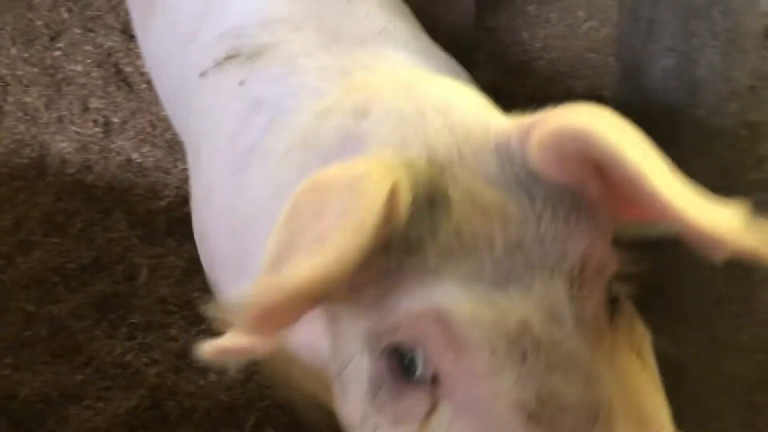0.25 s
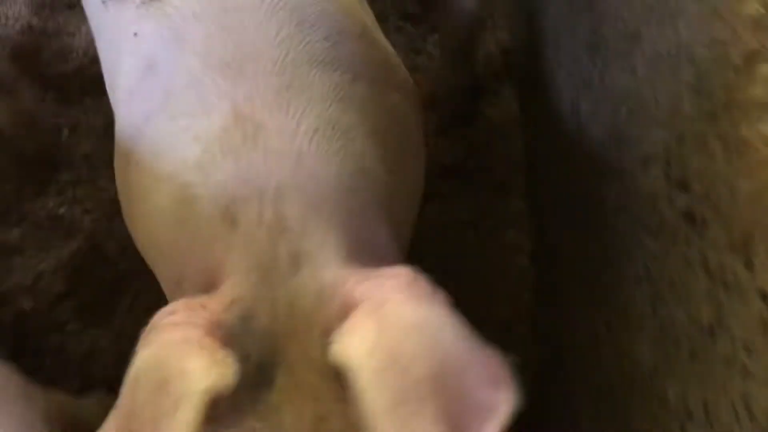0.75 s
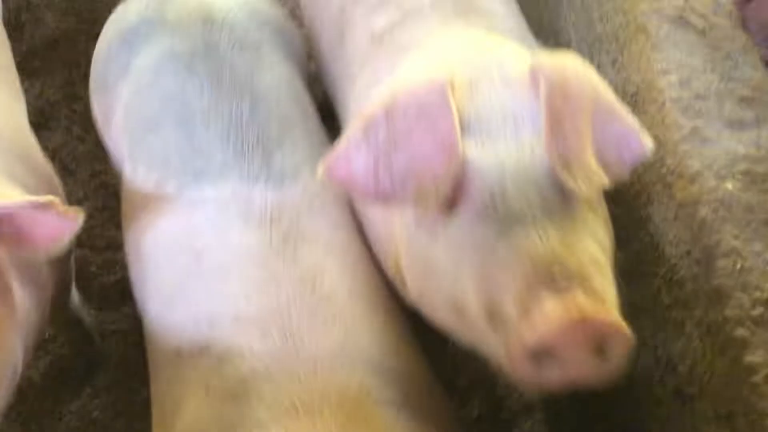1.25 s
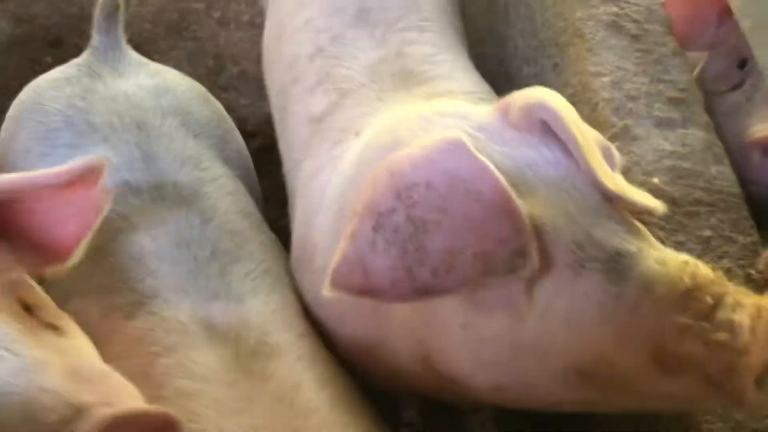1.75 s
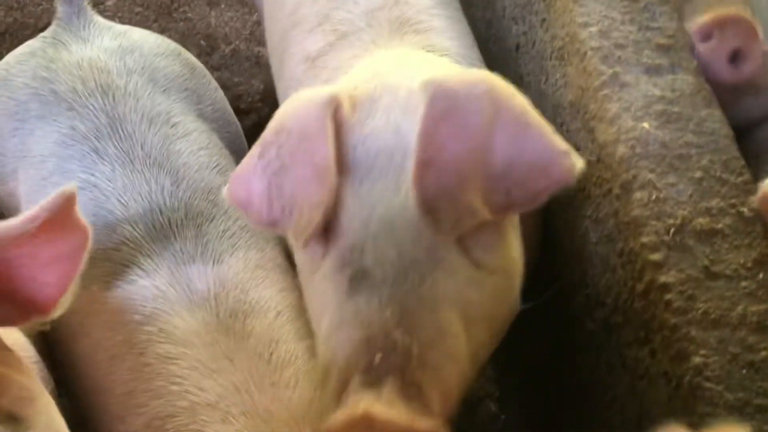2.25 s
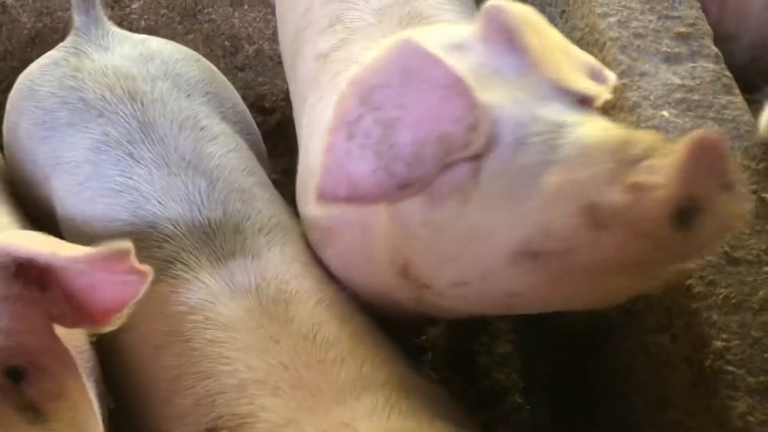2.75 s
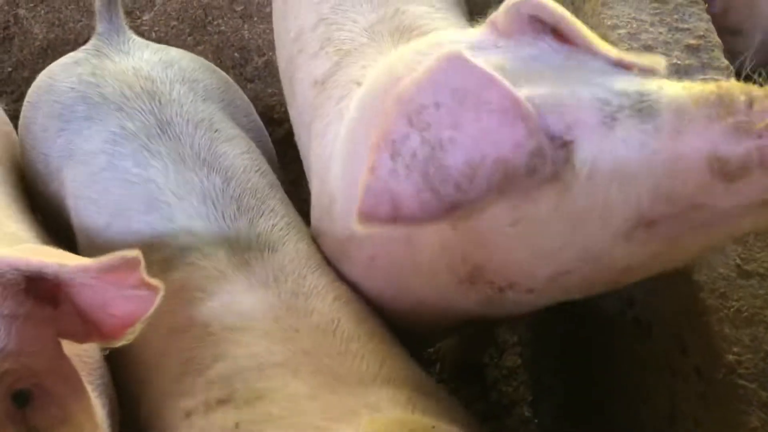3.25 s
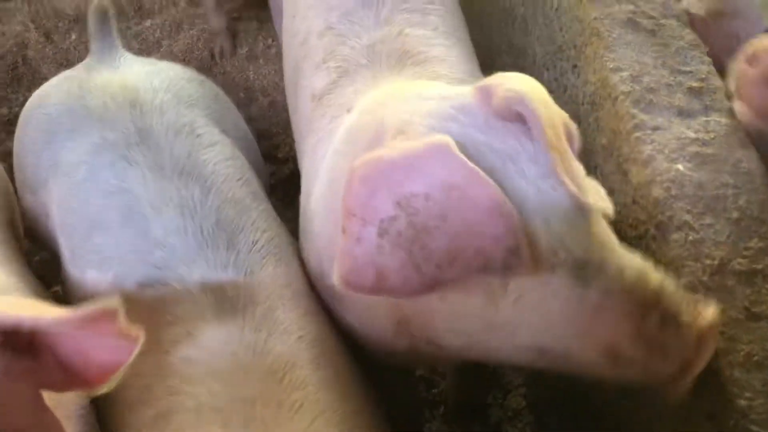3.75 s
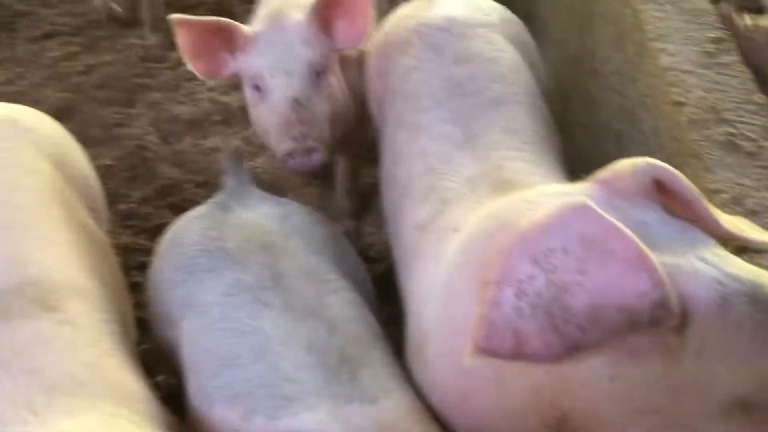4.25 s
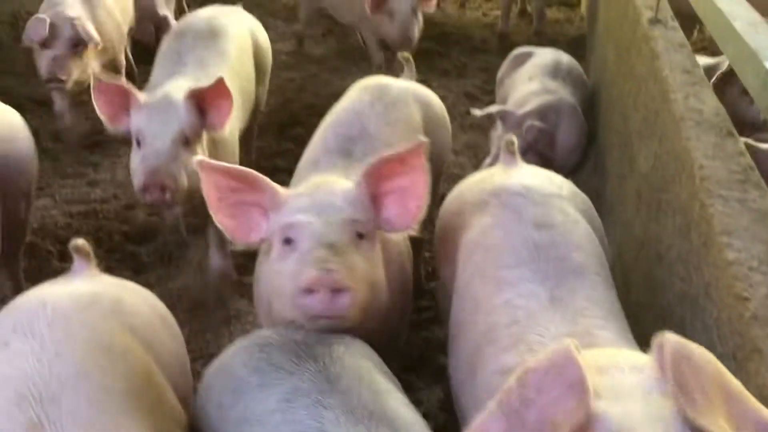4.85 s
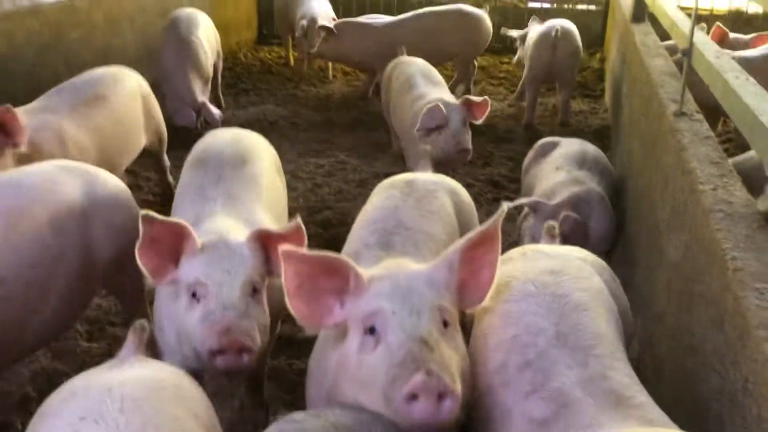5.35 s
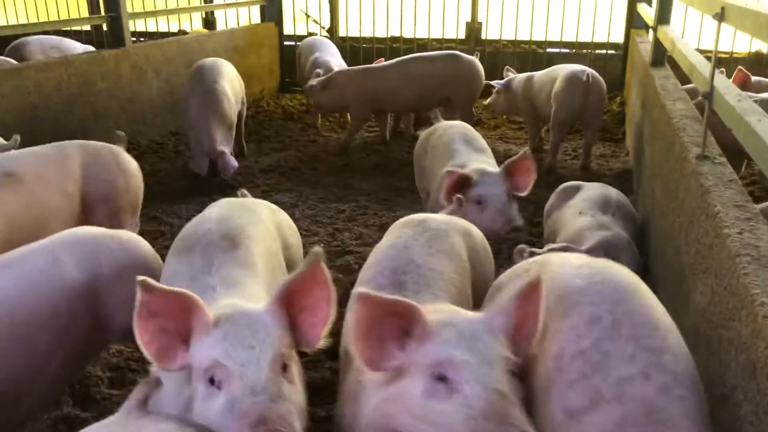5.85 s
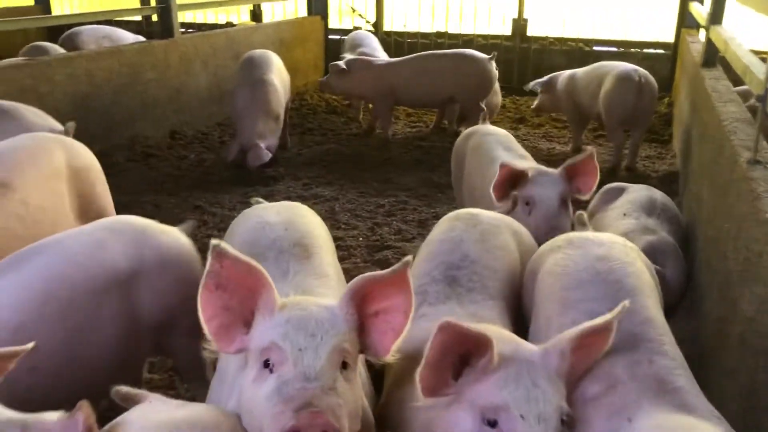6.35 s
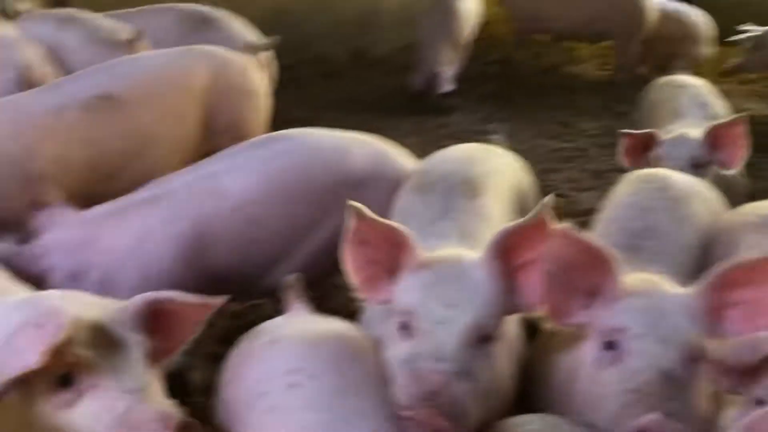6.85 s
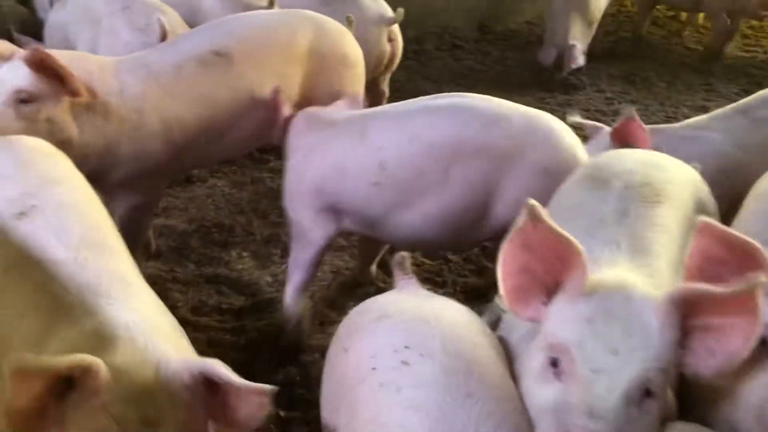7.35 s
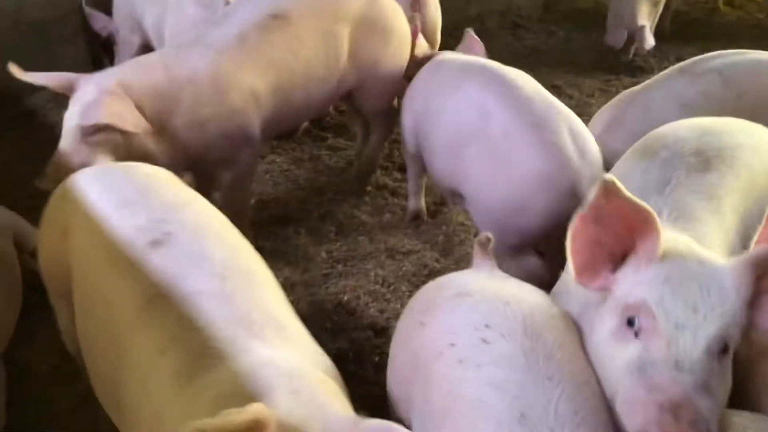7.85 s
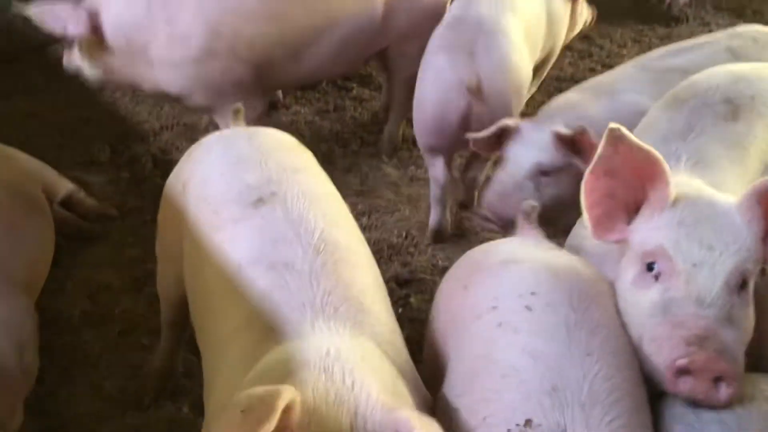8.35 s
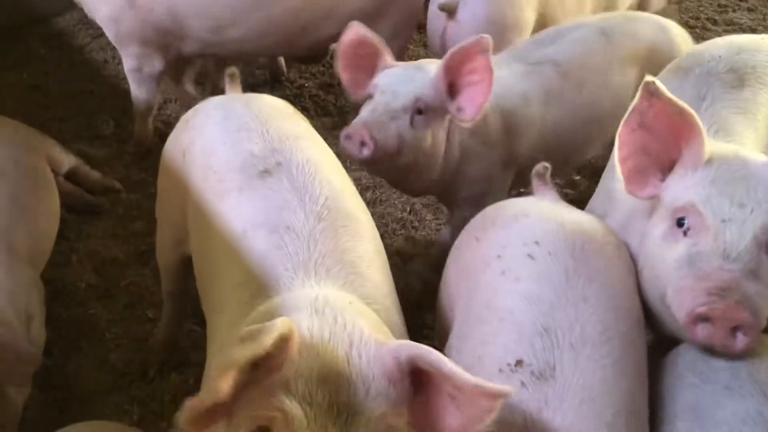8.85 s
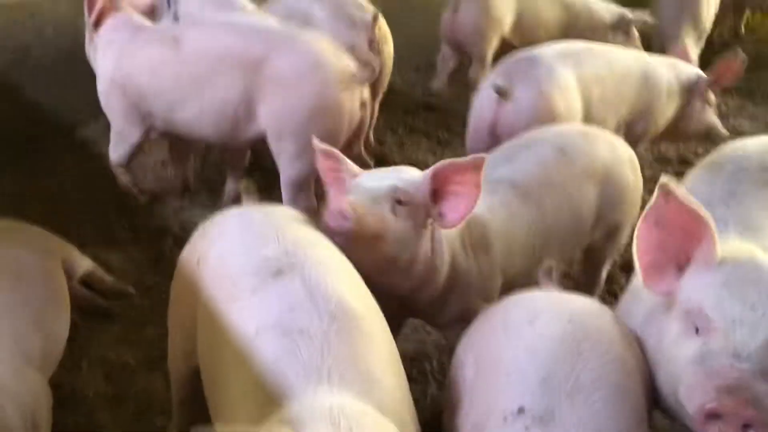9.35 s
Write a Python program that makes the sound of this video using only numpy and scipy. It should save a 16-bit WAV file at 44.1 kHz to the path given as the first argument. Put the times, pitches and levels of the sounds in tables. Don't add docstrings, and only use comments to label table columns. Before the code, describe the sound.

A crowded pen of young pigs, heard very close in a shed with a short, dull echo. From 0 to 1.5 seconds, rough open-mouthed grunts overlap, the loudest around 0.7 to 1.2; each is a brief flutter of about forty flaps a second. A firm, muted knock comes at 1.75. More bright, nasal and raspy grunts cluster at 1.9 to 3.2 with body thumps and hoof scuffles, then a soft knock at 3.3. Single grunts follow at 3.7 and 3.9. At 4.2 a hoof bangs the wall sharply, with a thud and quick flank scrape at 4.4. Afterwards it is quieter: isolated grunts at 5.1, 6.4, 7.15 and 7.7, a raspy one at 8.7, a sharper cry at 9.0 and a bright burst at 9.3. Throughout, distant grunts, faint whistling sniffs, low bumps and rustling straw continue.

```python
import sys
import numpy as np
from scipy import signal
from scipy.fft import rfft, irfft
from scipy.io import wavfile
from scipy.ndimage import uniform_filter1d

SR = 44100
rng = np.random.default_rng(int(sys.argv[2]) if len(sys.argv) > 2 else 0)


def output_pcm(signal):
    pcm = np.clip(np.atleast_2d(signal).T, -1, 1) * 32767
    wavfile.write(sys.argv[1], SR, np.round(pcm).astype(np.int16))


def volts(x):
    e = np.asarray(x, float) / 20
    return 10 ** e


N = 422919


def grunts():
    # (first flap [s], last flap [s], effort [dB],
    # swell from first to last flap [dB], chest level [dB])
    open_mouthed = [(0.118, 0.187, -4.5, 6.5, -6), (0.364, 0.39, -11, 3.5, 5),
                    (0.404, 0.474, -5, -6.5, 1.5)]
    bright = [(1.41, 1.435, -4, 4.2, 9.3), (1.948, 1.977, -5.5, 5.9, 8.8), (2.751, 2.808, -6.5, 0.96, 8)]
    wide = [(0.699, 0.743, 0, 0.5, 5.1), (0.825, 0.854, 1, 5.5, 0.51), (9.332, 9.384, -15, -13.5, 2.6)]
    cry = [(8.965, 9.01, -4, 5, 10.2)]
    big = [(0.751, 0.82, -15.5, -11, -17), (1.076, 1.076, -9.5, -2.5, 7.5),
           (1.255, 1.361, -16.5, -10.5, 2.5), (3.014, 3.068, -16, 0, 3), (9.291, 9.32, -18, -8, 1),
           (0.015, 0.09, -16, -11, -5), (0.152, 0.176, -24, 0, -8), (0.191, 0.19, 0, -2, -6),
           (0.212, 0.238, -24, -2, 0), (0.415, 0.415, -22, 0, -5), (0.527, 0.527, -12, -2, -5),
           (1.455, 1.455, -25, 0, -5)]
    bold = [(1.104, 1.149, 3.5, -1.2, 6.5)]
    rasp = [(0.3, 0.349, -21.5, 13, 4.5), (0.545, 0.572, -12, -2, 3), (2.175, 2.175, -6, -3, 5),
            (3.473, 3.553, -13, 5, -7), (3.709, 3.741, -2.5, -2, 3.5), (5.163, 5.217, -7.5, 4, 3.5),
            (7.216, 7.217, -14.5, 1, -5), (8.655, 8.793, -5, -3.5, 1.5), (8.708, 8.707, -5, 0, -6)]
    brisk = [(1.475, 1.541, -6, 4, 1.5), (2.115, 2.231, -16.5, -4, -2), (2.342, 2.39, -7.5, 9, 1),
             (2.398, 2.424, -12.5, -9, 14.5), (2.824, 2.907, -15.5, -11, 6.5), (3.092, 3.16, -8, -0.5, 8.5)]
    hollow = [(7.645, 7.769, -12, 3, 0), (6.407, 6.407, -7.5, 3, 2.4)]
    pinched = [(9.259, 9.312, -3.5, 5.7, -0.66)]
    quick = [(5.086, 5.149, -20, 2, -5), (6.73, 6.776, -23, -1.9, 8.5)]
    chesty = [(0.484, 0.512, -15, 2, 5), (0.526, 0.582, -12, 1, 13.5), (1.705, 1.704, -20.5, -3, -3),
              (2.008, 2.039, -19, -12, 18.5), (2.795, 2.796, -20, -5, 9), (3.02, 3.075, -24, -11, -6),
              (3.644, 3.669, -17.5, 2, 6), (4.537, 4.56, -25, 6, 8), (4.589, 4.676, -20, -12, 3),
              (6.006, 6.079, -22.5, 5, 19.5), (7.787, 7.912, -20.5, 4, 17), (8.089, 8.118, -16, 5.5, 13.5),
              (8.214, 8.241, -17, 3.5, 12), (9.557, 9.583, -26, -4, 11),
              (1.235, 1.5, -35, -1, 27), (1.18, 1.205, -35, -6, 5), (4.492, 4.492, -19, -2, 0),
             (5.002, 5.03, -23.5, -2, 0), (5.245, 5.262, -24, -7, 0), (5.98, 5.98, -26, -2, 15),
             (8.188, 8.188, -27, 2, 5), (8.84, 8.84, -22, 6, 5.5), (9.349, 9.378, -26, -5, -6),
             (0.2, 0.235, -20.5, -7, 3)]
    mumble = [(2.034, 2.192, -38, 3, 12), (6.989, 7.049, -28.5, -3, 3.1), (7.265, 7.347, -32, 4.5, 27)]
    dull = [(6.63, 6.702, -29, 3.1, 14), (8.401, 8.518, -20.5, 1.8, 4)]
    nasal = [(7.469, 7.523, -16, 10, -5)]
    rattle = [(5.778, 5.846, -20, 4.5, 5), (1.566, 1.566, -34, 0, 0)]
    climb = [(3.883, 3.885, -25, 4, -6), (3.911, 3.997, -13.5, -8, 4)]
    sharp = [(6.351, 6.379, -6, 4.1, 0)]
    snappy = [(7.126, 7.185, -6.5, -4, -1)]
    tick = [(7.095, 7.095, -24.5, 0, 10), (6.322, 6.322, -36, 0.0014, 0), (4.89, 4.902, -36, 0, -2),
            (4.928, 4.94, -38, 0, 0), (7.335, 7.335, -31, 0, 0), (0.364, 0.364, -27, 0, 0),
            (0.439, 0.439, -26, 0, 2)]
    callers = [open_mouthed, bright, wide, cry, big, bold, rasp, brisk, hollow, pinched, quick,
               chesty, mumble, dull, nasal, rattle, climb, sharp, snappy, tick]
    paces = [42, 42, 42, 65, 42, 42, 36, 42, 40, 40, 62, 40, 49, 42, 38, 60, 36, 36, 34, 80]
    # (chest [Hz], mouth [Hz], snout [Hz], nostrils [Hz])
    heads = [(322, 800, 1380, 4500), (379, 875, 1600, 4250), (402, 890, 1240, 3930), (398, 950, 1510, 5100),
             (348, 1000, 1724, 5400), (442, 1600, 1800, 3800), (252, 1100, 1520, 4400),
             (282, 810, 1450, 4310), (260, 759, 1450, 4200), (281, 830, 1440, 4900), (303, 733, 1580, 7000),
             (275, 650, 1700, 3600), (285, 683, 1100, 4300), (300, 740, 1600, 4290),
             (262, 1190, 1544, 4290), (313, 870, 1485, 4400), (244, 780, 1504, 5260),
             (241, 1180, 1500, 4950), (257, 1110, 1520, 4610), (260, 930, 1500, 4420)]
    # (mouth [dB], palate [dB], nostrils [dB], softening at the ends of a grunt [dB])
    manners = [(8, -26, -14.5, 5), (6.5, -18, -5, 6.5), (4.5, -41, -9, 7), (11.5, -46, -14, 8),
               (-20, -13, -17, 4.5), (-12, -27, -8, 5.5), (-16, -7.5, -10.5, 5.5), (-11, -8, -5.5, 3),
               (-12, -19, -17, 1.5), (-7.5, -42, -16, 1.4), (-2.5, -24, -27, 1.5), (9, -7, -4, 5),
               (15.5, -2, -2, 2.5), (3, -40, -31, 3.5), (7.5, -25, -40, 3), (-14, -5, -16, 0.5),
               (-27, -1.5, -4, 4.5), (-7, 0, -7, 2.5), (-4, -12, -6.5, 10.5), (-22, -10, 4, 0.5)]
    # (frequency [Hz], level [dB], frequency [Hz], level [dB], opening [share])
    sinus_rings = [(2060, -17, 2860, -17, 0.012), (2206, -7.5, 6000, -17.5, .01),
                   (2120, -16, 1670, -6.5, .01), (3630, -10, 3900, -10, -0.15),
                   (2840, -5.5, 4300, -7.5, 0.026), (2260, -7, 1500, -7, -0.0002),
                   (2554, -11, 4413, -13.5, 0.071), (2885, -8.5, 3900, -10, 0.053),
                   (2900, -13.5, 4860, -14, 0.035), (3010, -15, 6000, -16.5, 0.24),
                   (1910, -6.5, 3200, -25, 0.02), (2890, -3.5, 5900, -10, 0.044),
                   (2620, -6, 5500, -11, .03), (1770, -22, 3500, -17, .03), (2760, -12, 1500, -3, .03),
                   (2450, -10, 3800, -15, 0.026), (2532, -16, 1160, 2, 0.22), (2520, -4.5, 3960, -8, .16),
                   (2720, -4.5, 2100, -4, 0.026), (2960, -5, 7230, -5.5, 0.01)]
    rebound_db, second_rebound_db = -18.5, -29.5
    snout_opening = 0.034
    chest_ring = 0.36
    lead_s = .0005

    out = np.zeros(N)
    for calls, pace, head, manner, sinus in zip(callers, paces, heads, manners, sinus_rings):
        chest_hz, mouth_hz, snout_hz, nostril_hz = head
        *mouth_levels, arch_db = manner
        *sinus, nostril_opening = sinus
        for first, last, effort_db, swell_db, chest_db in calls:
            for u in np.linspace(-1, 1, round((last - first) * pace) + 1):
                db = effort_db + u * swell_db / 2 - u * u * arch_db
                s = first - lead_s + (last - first) * (u + 1) / 2
                late, weak, later = rng.random(3)
                sound = flap(chest_hz, mouth_hz, snout_hz * (1 + snout_opening * u),
                             nostril_hz * (1 + nostril_opening * u), chest_db, *mouth_levels,
                             np.reshape(sinus, (2, 2)), chest_ring / pace)
                add(out, s, volts(db - 3.0) * sound)
                add(out, s + .007 + .008 * late, volts(db + rebound_db - 10 * weak) * sound)
                add(out, s + .012 + .01 * later, volts(db + second_rebound_db + 8 * weak) * sound)
    return out


def flap(chest_hz, mouth_hz, snout_hz, nostril_hz, chest_db, mouth_db, palate_db, nostril_db, sinuses,
         chest_s):
    # (frequency [Hz], decay [s], level [dB])
    palate = [(2650, .0025, 0), (3050, .003, -1)]
    # (frequency [Hz], decay [s], level [dB])
    nostrils = [(3680, 0.0017, -6.5), (4370, 0.0015, 6), (4750, 0.0015, -1), (5800, 0.0024, -7),
                (7000, 0.00082, -15.5), (8400, 0.00057, -9), (11400, .0005, -22)]
    linger, linger_db = 3.47, -19.5
    nostril_late_s = 0.000982
    snap_hz, snap_s, snap_db = 8800, .00008, -6

    t = np.arange(2048) / SR
    luck = rng.standard_normal((17, 2))
    flap_luck = luck[-1]
    pitch_luck, level_luck = luck[:-1, :1], luck[:-1, 1:]

    modes = [(mouth_hz, .003, mouth_db - 4.0), (1200, .002, -7), (snout_hz, .0028, -2),
             (2230, .0025, palate_db / 2 - 7.0), (1.95 * chest_hz, .005, chest_db - 14.5)]
    modes += [(f, d, db + palate_db - 7.5) for f, d, db in palate]
    stretch = nostril_hz / nostrils[1][0]
    modes += [(f * stretch, 1.09 * d, db + nostril_db - 3.5) for f, d, db in nostrils]
    modes += [(f, .0022, db) for f, db in sinuses]
    hz, decay, db = np.array(modes).T[:, :, None]

    puff = np.minimum(t[:256] / .0007, 1) * np.exp(-(t[:256] / .0027) ** 4)
    air = .06 * rng.standard_normal((16, 256)) * puff
    air[:, 40] += 1.2 * volts(5 * flap_luck[1])

    chest = ring(t, chest_hz * (1 + 0.036 * flap_luck[0]), chest_s, chest_db - 8)
    out = (1 - np.exp(-t / 0.0012)) * chest
    out += ring(t, snap_hz, snap_s, snap_db + nostril_db + 4 * flap_luck[1])

    since = np.maximum(t[:1536] - nostril_late_s * np.abs(pitch_luck) * (hz > 3400), 0)
    db = db + np.minimum(hz / 800, 2) * level_luck
    hz = hz * (1 + .012 * pitch_luck)
    struck = ring(since, hz, decay, db)
    struck += ring(since, hz, linger * decay, db + linger_db - 12 * (hz > 4300))
    struck *= 1 - np.exp(-(since * hz / 2.2) ** 2)
    blown = signal.fftconvolve(struck, air, axes=1)
    balance = np.sqrt(np.sum(struck ** 2, axis=1) / np.sum(blown ** 2, axis=1))
    out[:blown.shape[1]] += balance @ blown
    return out


def ring(t, hz, decay, db):
    return volts(db) * np.exp(-t / decay) * np.sin(2 * np.pi * hz * t)


def add(track, s, sound):
    i = int(s * SR)
    track[i:i + len(sound)] += sound[:max(N - i, 0)]


def knocks():
    # (time [s], level [dB], rise [s], decay of the bass [s], tilt [dB/octave])
    blows = [
        (1.753, -23, 0.0077, 0.12, -3.5),
        (3.274, -33.5, 0.0049, 0.097, 2),
        (4.19, -41, 0.022, 0.027, -11),
        (4.227, -18.5, 0.00068, 0.078, 2.5),
        (4.233, -21.5, .001, 0.025, 3),
        (4.425, -29.5, 0.012, 0.065, 3.5),
        (2.672, -44, 0.0018, 0.041, 0),
    ]
    # (frequency [Hz], level [dB])
    blow_colour = [(29, -38), (50, -34), (220, -1), (418, -8), (570, 12.5), (898, -5.5), (1520, -12),
                   (2760, -18), (8460, -39.5), (15000, -45)]
    # (frequency [Hz], level [dB])
    boards = [(180, -3), (215, 2.5)]

    out, t = np.zeros(N), np.arange(SR // 2) / SR
    hz, db = np.transpose(blow_colour)
    for s, level_db, rise, decay, tilt_db in blows:
        onset = np.minimum(t / rise, 1)
        add(out, s, onset * sum(ring(t, f, decay / 2, level_db + d) for f, d in boards))
        for centre in 60 * 2. ** np.arange(8):
            octave = [(centre / 4, -70), (centre / 1.4, -3), (centre * 1.4, -3), (centre * 4, -70)]
            band = colour(rng.standard_normal(len(t)), octave)
            band_db = np.interp(np.log(centre), np.log(hz), db) + tilt_db * np.log2(centre / 500)
            gain = volts(level_db - 25 + band_db) * np.sqrt(centre)
            body = np.exp(-t / (decay * (centre / 250) ** -.3))
            crack = 3.3 * np.exp(-t / 0.0019) * min(centre / 250, 1)
            add(out, s, gain * band * onset * (body + crack))
    return out


def colour(x, points):
    hz, db = np.transpose(points)
    bins = np.fft.rfftfreq(len(x), 1 / SR) + 1
    y = irfft(rfft(x) * volts(np.interp(np.log(bins), np.log(hz), db)), len(x))
    return y / np.sqrt(np.mean(y ** 2))


def scrape():
    # (time [s], ring frequency [Hz], level [dB])
    course = [
        (4.4, 281, -45),
        (4.43, 622, -26),
        (4.452, 1142, -27),
        (4.48, 684, -30),
        (4.519, 352, -32),
    ]
    s, hz, db = np.transpose(course)
    t = np.arange(N) / SR
    hz = np.interp(t, s, hz)
    gain = volts(np.interp(t, s, db, left=-120, right=-120))
    return gain * (narrow(hz, 270) + volts(-10) * narrow(1.75 * hz, 220) + volts(-19) * narrow(2.1 * hz, 300))


def narrow(hz, width_hz):
    k = int(SR / width_hz)
    slow = uniform_filter1d(rng.standard_normal((2, len(hz))), k) * np.sqrt(k)
    turn = 2 * np.pi * np.cumsum(hz) / SR
    return slow[0] * np.cos(turn) + slow[1] * np.sin(turn)


def sniffs():
    # (time [s], length [s], level [dB], first frequency [Hz], last frequency [Hz])
    puffs = [(.3, 0.084, -52, 6500, 6500), (0.435, .16, -57, 6004, 6506), (1.744, 0.07, -44, 5100, 6030),
             (3.64, .13, -40.5, 6480, 7000), (4.7, .2, -50.5, 5530, 5820), (5.33, .16, -49, 5320, 5090),
             (5.634, .17, -52, 4310, 4070), (6.07, 0.14, -44.5, 5500, 5720),
             (6.393, 0.042, -67, 5860, 6800), (7.76, 0.15, -60, 5400, 7000), (7.9, 0.17, -46, 5480, 7000),
             (8.8, 0.13, -49, 7000, 6640), (9.33, 0.11, -50.5, 5400, 7000)]
    width_hz = 1300
    out = np.zeros(N)
    for s, length, db, first_hz, last_hz in puffs:
        u = np.linspace(0, 1, int(length * SR))
        hz = first_hz + (last_hz - first_hz) * u
        whistle = narrow(hz, width_hz) + volts(-5) * narrow(1.5 * hz, width_hz)
        add(out, s, volts(db) * np.sqrt(np.sin(np.pi * u) + 1e-9) * whistle)
    return out


def herd():
    # (time [s], hold [s], level [dB])
    bouts = [(0.113, 0.099, -30), (0.402, 0.17, -26), (0.841, 0.035, -24.5), (0.966, 0.044, -46),
             (1.045, 0.14, -26), (1.258, 0.16, -24.5), (1.439, 0.14, -23), (1.694, 0.18, -28.5),
             (1.946, 0.054, -27), (2.02, 0.04, -23), (2.102, 0.13, -26.5), (2.341, 0.089, -22),
             (2.782, 0.09, -29), (2.89, 0.065, -36), (3.05, 0.14, -25), (3.262, 0.05, -32),
             (3.68, 0.049, -31.5), (3.934, 0.07, -33), (4.232, 0.12, -22.5), (4.349, 0.16, -39),
             (4.649, 0.057, -28.5), (4.946, 0.2, -36), (5.194, 0.04, -26), (6.022, 0.056, -32.5),
             (6.378, 0.044, -36), (6.714, 0.089, -33), (7.057, 0.23, -32.5), (7.28, 0.087, -30),
             (7.5, 0.28, -41), (7.785, 0.13, -26.5), (8.176, 0.11, -29), (8.302, 0.08, -39),
             (8.425, 0.096, -32.5), (8.678, 0.22, -32.5), (9.036, 0.1, -36), (9.301, 0.078, -27.5)]
    out, t = np.zeros(N), np.arange(2048) / SR
    # (chest [Hz], snout [Hz], flap rate [Hz])
    for chest_hz, snout_hz, rate in [(251.7, 1324, 36.), (270.0, 2000, 41.),
                                     (311.6, 1152, 45.), (231.6, 1750, 33.)]:
        phase = np.cumsum(rate * (1 + .08 * walk(12))) / SR
        flaps = np.diff(np.floor(phase), prepend=0)
        flaps = flaps * volts(7.9 * walk(5) + 2.97 * rng.standard_normal(N))
        voice = (1 - np.exp(-t / 0.008)) * ring(t, chest_hz, 0.012, 0)
        voice += ring(t, 1.86 * chest_hz, 0.0034, -4.5)
        voice += ring(t, snout_hz, .004, -17) + ring(t, 2.7 * snout_hz, .002, -22)
        out += signal.fftconvolve(flaps, voice)[:N]
    out /= np.sqrt(np.mean(out ** 2))
    return out * stirs(*np.transpose(bouts), floor_db=-47.5, attack=0.041, release=0.018)


def walk(rate):
    k = int(SR / rate)
    return uniform_filter1d(np.repeat(rng.standard_normal(N // k + 1), k), k)[:N]


def jostling():
    # (time [s], hold [s], body rumble [dB], hoof scuffle [dB])
    jostles = [(0.004, 0.18, -42, -34), (0.436, 0.17, -33.5, -29.5), (0.71, 0.087, -35, -48),
               (1.116, 0.033, -38, -24), (1.316, 0.25, -35, -49), (1.719, 0.12, -29, -34),
               (1.982, 0.1, -30, -25), (2.123, 0.095, -33, -26), (2.394, 0.024, -34, -26),
               (2.826, 0.041, -23, -28), (3.103, 0.069, -23.5, -28), (3.278, 0.15, -36, -35),
               (3.736, 0.073, -38, -40), (3.944, 0.046, -49, -27.5), (4.193, 0.14, -26, -34),
               (4.395, 0.14, -35, -30), (5.203, 0.12, -30, -39.5), (6.06, 0.23, -43.5, -49),
               (6.363, 0.081, -42.5, -57), (7.073, 0.12, -42, -34), (7.474, 0.097, -46, -33),
               (7.64, 0.35, -40, -45), (8.22, 0.11, -29.5, -41), (8.682, 0.11, -39.5, -35.5),
               (9.048, 0.077, -53, -39), (9.302, 0.041, -48, -31)]
    # (frequency [Hz], level [dB])
    rumble_colour = [(25, -43), (40, -59), (60, 3), (100, 10.5), (150, 8), (210, -2), (320, -56)]
    # (frequency [Hz], level [dB])
    scuffle_colour = [(300, 13), (500, 6), (700, 3), (1000, -3.5), (1500, -1), (2200, -19), (3200, -11),
                      (5000, -28)]
    s, hold, rumble_db, hoof_db = np.transpose(jostles)
    bodies = stirs(s, hold, rumble_db, floor_db=-50.5, attack=0.0072, release=0.065)
    hooves = stirs(s, hold, hoof_db, floor_db=-44, attack=0.032, release=0.064)
    return bodies * grit(rumble_colour, 0, 0.5, 0) + hooves * grit(scuffle_colour, 3.74, 2.94, 2.5)


def straw():
    # (time [s], hold [s], level [dB])
    rooting = [(0, 0.037, -50), (0.32, 0.26, -45), (0.7, 0.22, -46), (0.95, 0.23, -42.5),
               (1.466, 0.19, -39.5), (1.771, 0.043, -37.5), (1.92, 0.26, -42.5), (2.375, 0.076, -44.5),
               (2.497, 0.39, -46), (3.007, 0.14, -42.5), (3.463, 0.13, -44), (3.64, 0.11, -38),
               (3.95, 0.13, -45), (4.24, 0.042, -38), (4.424, 0.053, -36.5), (4.558, 0.17, -44),
               (4.855, 0.28, -47), (5.19, 0.23, -47.5), (6.045, 0.089, -59), (7.57, 0.074, -49.5),
               (7.817, 0.064, -44), (7.933, 0.23, -47), (8.295, 0.091, -45.5), (8.725, 0.25, -46),
               (9.043, 0.11, -48.5), (9.302, 0.072, -56)]
    # (frequency [Hz], level [dB])
    stalk_colour = [(2000, 2), (3200, -0.5), (4500, 2.5), (6500, -0.5), (9000, -4.5), (12000, -12.5),
                    (15500, -14), (18000, -30)]
    gain = stirs(*np.transpose(rooting), floor_db=-48.5, attack=0.035, release=0.046)
    return volts(1.0) * gain * grit(stalk_colour, 2.86, 2.8, 2.5)


def stirs(s, hold, db, floor_db, attack, release):
    now, power = np.arange(0, N, 64) / SR, volts(2 * floor_db)
    for start, h, d in zip(s, hold, db):
        rise = np.minimum((now - start) / attack, 0)
        fall = np.maximum(now - start - h, 0) / release
        power = power + (volts(d) * np.exp(rise - fall)) ** 2
    return np.interp(np.arange(N) / SR, now, np.sqrt(power))


def grit(points, grain_db, flicker_db, patchy_db):
    grains = rng.standard_normal(N) * volts(grain_db * np.minimum(rng.exponential(size=N), 6))
    cells = signal.stft(colour(grains, points), nperseg=1024)[2]
    patches = rng.standard_normal(cells.shape)
    for _ in range(2):
        patches = uniform_filter1d(patches, size=36, axis=0)
        patches = uniform_filter1d(patches, size=12, axis=1)
    patchy = signal.istft(cells * volts(patchy_db * patches / patches.std()))[1][:N]
    return patchy * volts(flicker_db * walk(25))


def shed(x):
    t60_s, build_up_s = .3, 0.038
    t = np.arange(SR // 2) / SR
    tail = colour(rng.standard_normal(len(t)),
                  [(100, -6), (500, 0), (2000, -2), (6000, -9), (16000, -25)])
    tail = tail * np.exp(-np.log(1000) * t / t60_s) * np.minimum(t / build_up_s, 1)
    return signal.fftconvolve(x, tail / np.sqrt(np.sum(tail ** 2)))[:N]


def scene():
    near = grunts() + knocks() + scrape()
    echoes = volts(-24) * shed(near)
    return (near + echoes + sniffs() + herd() + jostling() + straw())[None]


def top_cut(x):
    return signal.sosfilt(signal.butter(12, 16460, fs=SR, output="sos"), x)


def record(dry):
    high_pass = signal.butter(4, 53, "high", fs=SR, output="sos")
    low_pass = signal.ellip(12, .2, 80, 15750, fs=SR, output="sos")
    wet = np.tanh(signal.sosfilt(high_pass, dry))
    wet = signal.sosfilt(low_pass, wet)
    return top_cut(wet)


dry = scene()
out = record(dry)
output_pcm(out)
```